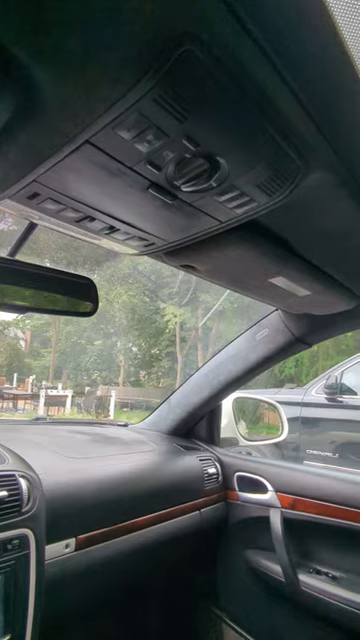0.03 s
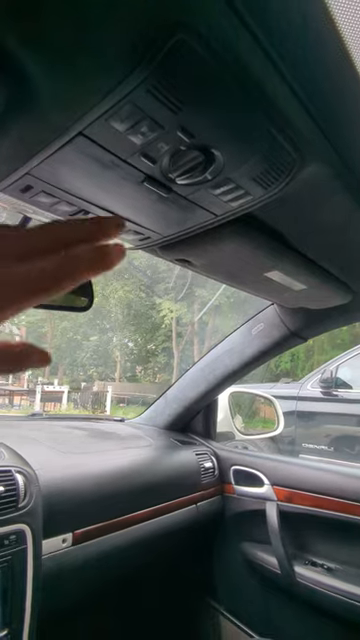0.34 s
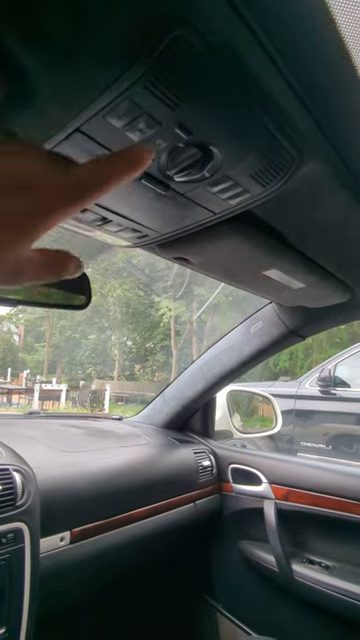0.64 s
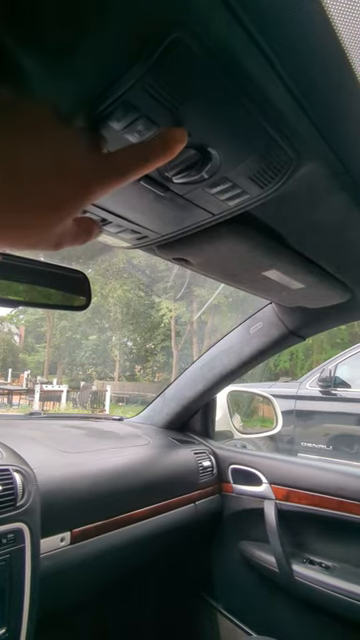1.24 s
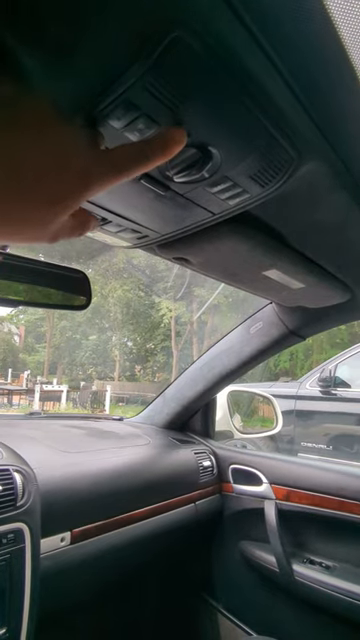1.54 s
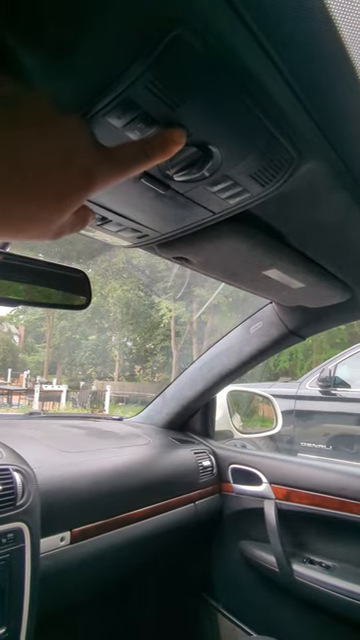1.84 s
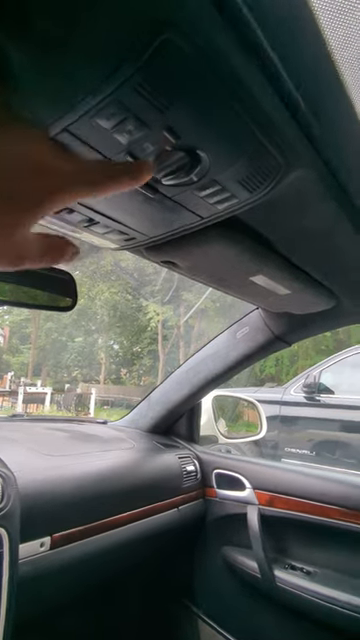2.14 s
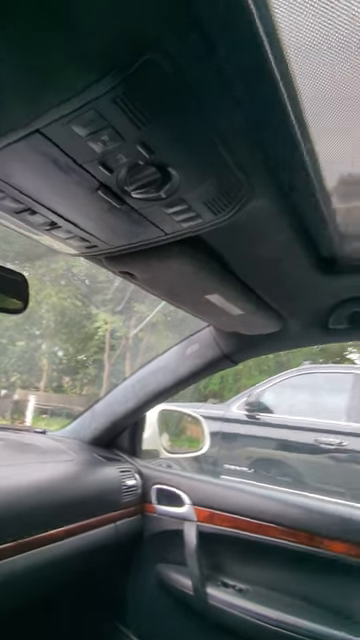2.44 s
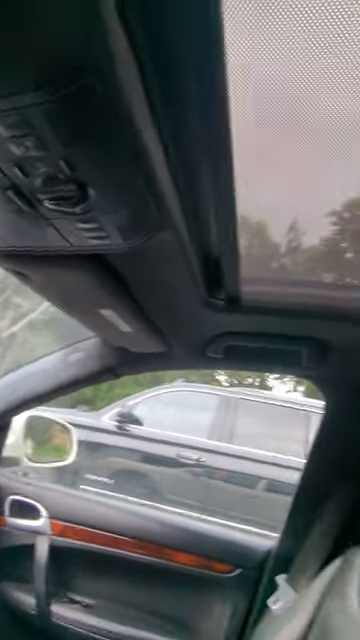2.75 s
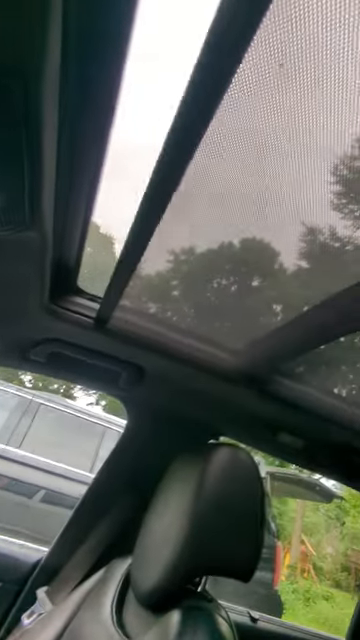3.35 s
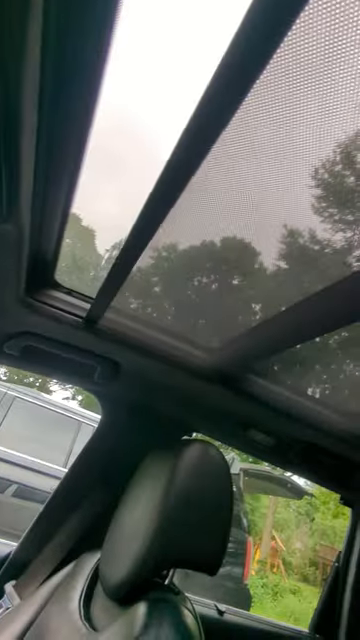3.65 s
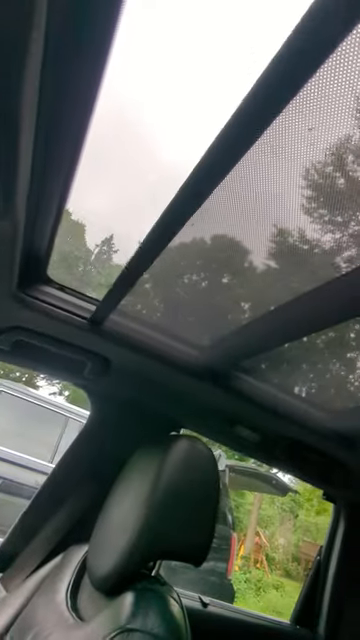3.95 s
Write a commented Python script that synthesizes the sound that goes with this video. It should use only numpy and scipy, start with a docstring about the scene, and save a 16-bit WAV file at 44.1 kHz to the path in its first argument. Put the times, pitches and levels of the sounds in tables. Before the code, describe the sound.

A car's sunshade motor whirs and slides the shade open after a switch click.

```python
"""A small geared motor takes up its slack with a clatter and whirs on, drawing a car's sunshade along
its rails. Its tones are multiples of one rotation speed, and its brush hiss rings in the housing.
Sliding friction makes the shade rumble, hiss, rub, squeal briefly and creak; it also bumps and ticks.
Just before the motor starts, a finger clicks a switch in the hollow roof console.
Beneath it all the parked car idles with a low hum."""
import sys
import numpy as np
from scipy import signal
from scipy.fft import rfft, irfft
from scipy.io import wavfile

SR = 44100
rng = np.random.default_rng(int(sys.argv[2]) if len(sys.argv) > 2 else 0)


def put_to_file(sound):
    """Save the sound as 16-bit audio at rate SR, in the file named by the first command-line argument."""
    columns = np.atleast_2d(sound).T  # one column per channel
    safe = np.clip(columns, -1, 1)
    whole_steps = np.round(safe * 32767)
    wavfile.write(sys.argv[1], SR, whole_steps.astype(np.int16))


N = 176400
T = np.arange(N) / SR
MOTOR_START_S, SPIN_UP_S = 2.055, .05
CABIN_T60_S, CUTOFF_HZ = 0.1, 16000

# Friction on the rails. Each row: time in seconds, rumble level in dB, hiss level in dB.
RAIL_FRICTION = [(2.15, -51, -52.5), (2.42, -47, -49), (2.55, -48, -46.5), (2.74, -44.5, -45),
                 (2.86, -45, -49), (3.1, -44, -47.5), (3.25, -43.5, -46), (3.45, -41, -45),
                 (3.62, -47, -50), (4.0, -48, -49)]


def from_db(db):
    """Amplitude grows tenfold with every 20 dB."""
    return 10 ** (np.asarray(db) / 20)


def rms_one(x):
    """Dividing by the root mean square gives unit power."""
    return x / np.sqrt(np.mean(x ** 2) + 1e-20)


def in_time(rows):
    """Linear interpolation in time turns each column into a continuous curve."""
    s, *columns = np.transpose(rows)
    return [np.interp(T, s, c) for c in columns]


def at_hz(points, hz):
    """Interpolation on a log-frequency axis reads a spectrum between its points."""
    f, value = np.transpose(points)
    return np.interp(np.log(hz + 1e-9), np.log(f), value)


def pan(db):
    """A level difference, left minus right in dB, is split evenly between the ears."""
    return from_db(np.array([[db / 2], [-db / 2]]))


def drift(rate_hz):
    """Low-passed noise gives a random fluctuation of unit power."""
    f = np.arange(N // 2 + 1) * SR / N
    return rms_one(irfft(rfft(rng.standard_normal(N)) / (1 + (f / rate_hz) ** 2), N))


def noise(spectrum, correlation=None):
    """Coloured noise of unit power, whose common and opposed parts set the interaural correlation."""
    # Likeness at the ears of sound from the roof. Each row: frequency in Hz, correlation.
    roof_correlation = [(100, 0.92), (300, -0.28), (600, 0.58), (1200, -0.58), (4000, 0.11), (10000, 0.078)]
    f = np.arange(N // 2 + 1) * SR / N
    mid, side = rfft(rng.standard_normal((2, N)))
    alike = np.clip(at_hz(roof_correlation if correlation is None else correlation, f), -1, 1)
    both = np.sqrt(1 + alike) * mid + np.sqrt(1 - alike) * side * [[1], [-1]]
    return rms_one(irfft(both * from_db(at_hz(spectrum, f)) * (f > 20), N))


def impulses(rows):
    """Brief contacts act as impulses. Each row: time in seconds, level in dB, left-right dB."""
    out = np.zeros((2, N)) + 1e-18
    for s, db, side_db in rows:
        out[:, min(int(s * SR), N - 1)] += from_db(db) * pan(side_db)[:, 0]
    return out


def ring(x, hz, t60):
    """A damped oscillator answers each impulse with a sine that falls 60 dB in t60 seconds."""
    r, w = from_db(-60 / (t60 * SR)), 2 * np.pi * hz / SR
    return signal.lfilter([0, np.sin(w)], [1, -2 * r * np.cos(w), r * r], x)


def struck(x, modes):
    """A body's response is the superposition of its modes, here with alternating signs."""
    return sum((-1) ** k * from_db(db) * ring(x, hz, t60) for k, (hz, db, t60) in enumerate(modes))


def resonate(x, resonances):
    """A resonance rings for a time inversely proportional to its bandwidth."""
    return struck(x, [(hz, db, np.log(1000) / (np.pi * width)) for hz, width, db in resonances])


def decaying_power(x, t60):
    """Damping makes the power of each impulse decay exponentially."""
    return signal.lfilter([1], [1, -from_db(-120 / (t60 * SR))], x ** 2)


def crack(rows, spectrum, t60, tail_db, rise_s=0.001):
    """Dense plastic modes merge into noise: a quick rise, a fast decay and a short cabin tail."""
    hits = impulses(rows)
    power = decaying_power(hits, t60) + from_db(tail_db) ** 2 * decaying_power(hits, CABIN_T60_S)
    pole = np.exp(-1 / (rise_s * SR))
    return noise(spectrum) * np.sqrt(signal.lfilter([1 - pole], [1, -pole], power))


def diffuse(x, envelope):
    """Many random echo paths act as convolution with shaped noise of unit energy."""
    echoes = rng.standard_normal((2, len(envelope))) * envelope
    return signal.fftconvolve(x, echoes / np.sqrt(np.sum(echoes ** 2) / 2), axes=1)[:, :N]


def reflections(x):
    """Reflections off glass and trim form a short reverberation that begins after 2 ms."""
    t = T[:SR // 5]
    return diffuse(x, from_db(-60 * t / CABIN_T60_S) * (t > .002))


def scattered(x, decay_s=.0005):
    """Scattering from nearby trim smears each tick over a millisecond or two."""
    return diffuse(x, np.exp(-T[:SR // 100] / decay_s))


def lagged(x, lag_s=0.00038):
    """Interaural delay: sound from the roof reaches the right ear a little later."""
    return np.array([x[0], np.interp(T - lag_s, T, x[1])])


def cabin_balance(x):
    """The cabin's transfer function favours one ear or the other according to frequency."""
    # Each row: frequency in Hz, left-right difference in dB.
    balance = [(100, 1.5), (380, -1), (700, 2), (1300, -1.5), (2300, -1.5), (4400, -2), (8000, 1),
               (15000, 1)]
    side_db = at_hz(balance, np.arange(N // 2 + 1) * SR / N)
    return irfft(rfft(x) * pan(side_db)[:, 0], N)


def idle():
    """The engine's periodic vibration gives wavering tones over the broadband noise of the cabin air."""
    # Engine tones. Each row: frequency in Hz, level in dB.
    engine_tones = [(37.7, -53), (113, -59), (183, -58), (269, -65)]
    # Cabin noise. Each row: frequency in Hz, relative spectral density in dB.
    air_spectrum = [(30, -18), (45, 1), (62, -8.5), (100, -2.5), (145, -8), (190, -6), (250, -10.5),
                    (400, -16.5), (560, -22.5), (700, -28), (1000, -29.5), (1300, -37.5), (2500, -45.5),
                    (5000, -53.5), (9000, -57.5), (16000, -63)]
    # Its likeness at the two ears. Each row: frequency in Hz, correlation.
    air_correlation = [(40, 0.95), (120, 1), (300, 0.63), (1000, 0.22), (8000, 0)]
    hum = sum(from_db(db + 0.06 * drift(3.2)) * np.sin(2 * np.pi * hz * T + 0.35 * drift(1.0))
              for hz, db in engine_tones)
    return np.sqrt(2) * hum + from_db(-48.5) * noise(air_spectrum, air_correlation)


def finger():
    """Friction of skin on the plastic console gives faint swells of noise."""
    # Each row: time of the peak in seconds, half-width in seconds, level in dB.
    touches = [(1.07, 0.044, -62), (1.656, 0.022, -60), (1.825, 0.12, -62)]
    # Skin friction. Each row: frequency in Hz, relative spectral density in dB.
    skin_spectrum = [(500, 5.5), (1200, 9.5), (2500, -4), (6000, -17), (15000, -28)]
    contact = sum(from_db(db) * np.exp(-((T - s) / width) ** 2) for s, width, db in touches)
    return noise(skin_spectrum) * contact


def switch(t60=0.031, tail_db=-5.5, console_lag_s=0.0016):
    """Impulse excitation: each click snaps, then sets the hollow console ringing."""
    # Each row: time in seconds, then the levels in dB of snap, tock and thump.
    clicks = [(1.779, -68, -52.5, -48), (1.8217, -58, -41.5, -40.5), (1.87, -51, -49.5, -49),
              (1.8967, -29, -33.5, -25.5), (1.907, -40, -38.5, -38), (1.9316, -61, -46.5, -51)]
    # Bright snap and hollow tock. Each row: frequency in Hz, relative spectral density in dB.
    snap_spectrum = [(3000, -12), (5000, -17), (6200, -2.5), (7400, -9), (9300, 2), (11000, -2.5),
                     (13000, 1.5), (15500, -2)]
    tock_spectrum = [(350, -18), (550, -23), (900, 2.5), (1300, -5.5), (2150, -0.5), (3100, -13),
                     (4000, -10), (5000, -17), (9000, -26)]
    # Each row: frequency in Hz, gain in dB, time to fall 60 dB in seconds.
    console_modes = [(139, -2, 0.14), (205, -1, 0.082), (419, 2, 0.016), (548, 1, 0.037),
                     (665, -3.5, 0.028), (890, -8, 0.052)]
    s, snap_db, tock_db, thump_db = np.transpose(clicks)
    centre = np.zeros(len(s))
    snap = crack(zip(s, snap_db, centre), snap_spectrum, t60, tail_db)
    tock = crack(zip(s + console_lag_s, tock_db, centre), tock_spectrum, t60, tail_db)
    thump = struck(impulses(zip(s + console_lag_s, thump_db, centre)), console_modes)
    return snap + tock + thump + from_db(-3.5) * reflections(thump)


def creaks(slip_s=.0067, jitter=.17, fade_db_per_s=35, spread_db=2.5):
    """Stick-slip motion of the shade excites resonances with quick, uneven runs of pulses."""
    # Each row: start in seconds, length in seconds, nominal level of the first slip in dB.
    runs = [(3.348, .066, -29.3), (3.451, .022, -33.5), (3.5235, .012, -32)]
    # Each row: frequency in Hz, bandwidth in Hz, gain in dB.
    resonances = [(1850, 450, 0), (2450, 650, -2), (3200, 600, -3), (5500, 2500, -13)]
    slips = []
    for start, length, db in runs:
        for age in np.arange(0, length, slip_s):
            s = start + age + slip_s * rng.normal(0, jitter)
            slip_db = db - fade_db_per_s * age + rng.normal(0, spread_db)
            slips.append((s, slip_db, rng.normal(0, spread_db)))
    direct = resonate(impulses(slips), resonances)
    return direct + from_db(-12) * reflections(direct)


def ticks(running, grit_per_s=57, grit_db=8.5):
    """Small impacts in the rails, single ticks and fine random grit, excite broad resonances."""
    # Each row: time in seconds, level in dB, left-right difference in dB, low-pass corner in Hz.
    impacts = [(3.0895, -24, 1, 9000), (3.099, -27, 0, 7000), (3.13, -29, 4, 6000), (3.18, -27.5, 0, 5000),
               (3.2972, -20.5, 7, 5500), (3.3135, -20.5, -3, 5000), (3.3405, -17.5, 7, 11000),
               (3.444, -20, 10, 12000), (3.5165, -20.5, 6, 4200), (3.5762, -19, 6, 7000),
               (3.7228, -19.5, 9, 5600)]
    # Each row: frequency in Hz, bandwidth in Hz, gain in dB.
    resonances = [(1700, 700, -4), (2970, 1230, -2), (4900, 1670, -1), (8600, 1600, -5)]
    _, hiss_db = in_time(RAIL_FRICTION)
    grains = rng.random(N) < grit_per_s / SR
    grit = running * grains * from_db(hiss_db + grit_db) * rng.standard_normal((2, N))
    taps = 0
    for *impact, corner_hz in impacts:
        dulling = signal.butter(2, min(corner_hz, CUTOFF_HZ), fs=SR, output="sos")
        taps = taps + signal.sosfilt(dulling, impulses([impact]))
    direct = resonate(taps + grit, resonances)
    return from_db(-4.5) * direct + from_db(-10) * scattered(direct) + from_db(-8.5) * reflections(direct)


def squeal(roughness=1.2, rough_hz=85):
    """Self-excited oscillation: friction on the rail locks into one rough, slightly falling tone."""
    # Each row: time in seconds, frequency in Hz, level in dB.
    contour = [(2.54, 3030, -68), (2.59, 3010, -53.5), (2.63, 2980, -51.5), (2.69, 2920, -55),
               (2.735, 2910, -59), (2.76, 2930, -53), (2.8, 2930, -70)]
    hz, db = in_time(contour)
    sounding = (T > contour[0][0]) & (T < contour[-1][0])
    # A complex factor disturbs both amplitude and phase.
    grip = np.array([1 + roughness * (drift(rough_hz) + 1j * drift(rough_hz)) for ear in range(2)])
    tone = np.real(grip * np.exp(2j * np.pi * np.cumsum(hz) / SR))
    return sounding * from_db(db) * rms_one(tone)


def shade(running, grains_per_s=350):
    """Uneven sliding friction makes the shade rumble and hiss; gritty rubs excite resonances."""
    # Sliding noises. Each row: frequency in Hz, relative spectral density in dB.
    rumble_spectrum = [(40, -6), (80, 2.5), (120, -3.5), (180, 4), (250, -7.5), (330, -1.5), (420, -2.5),
                       (600, -9.5), (900, -11.5), (1500, -38), (4000, -38)]
    hiss_spectrum = [(400, -30), (900, 3.5), (1250, 4.5), (1600, 3), (2200, 0.5), (3200, -6), (4700, -11),
                     (7000, -11.5), (9000, -16), (15000, -16)]
    # Each row: start and end in seconds, level in dB, resonance in Hz, bandwidth in Hz.
    rubs = [(2.48, 2.6, -52.5, 850, 300), (2.56, 2.79, -48.5, 1510, 45), (2.79, 2.97, -54.5, 1500, 30),
            (2.78, 3.02, -58, 4450, 130), (2.44, 3.28, -55.5, 1950, 600)]
    rumble_db, hiss_db = in_time(RAIL_FRICTION)
    rough_db = 1.5 * drift(36)
    rumble = from_db(rumble_db + rough_db) * noise(rumble_spectrum)
    hiss = from_db(hiss_db + rough_db) * noise(hiss_spectrum)
    out = running * (rumble + hiss)
    for start, end, db, hz, width in rubs:
        progress = np.clip((T - start) / (end - start), 0, 1)
        pressure = np.sqrt(np.abs(np.sin(np.pi * progress)))
        grains = (rng.random(N) < grains_per_s / SR) * rng.standard_normal((2, N))
        ringing = rms_one(resonate(grains + 1e-18, [(hz, width, 0)]))
        out = out + from_db(db + rough_db) * pressure * ringing
    return out


def knocks(t60=0.029, tail_db=-4.5, boom_t60=0.021):
    """Impacts of drive and shade excite free vibration: the roof thuds, plastic clacks, rails rattle."""
    # Each row: time in seconds; thud, clack, rattle, left-right difference and boom in dB;
    # boom frequency in Hz, which depends on where the knock lands.
    impacts = [(2.049, -35.5, -44.5, -46, 4, -34, 200), (2.0597, -26.5, -39.5, -43, -7, -32, 160),
               (2.068, -26, -31, -51, 2, -16.5, 290), (2.075, -21.5, -30.5, -43, -1, -26.5, 420),
               (2.078, -23.5, -35, -49, 6.5, -17.5, 320), (2.0849, -20.5, -33.5, -27, -0.5, -28, 186),
               (2.1059, -28.5, -26, -33.5, 1, -39, 260), (2.1131, -42, -29, -35.5, -3, -27, 170),
               (2.1175, -38, -43, -50, 1, -19, 148), (2.753, -34, -50, -56, 0, -27, 150),
               (2.922, -28.5, -39, -48, -0.5, -26, 217), (3.034, -41, -42, -45, -1, -34, 300),
               (3.046, -39, -60, -62, 7, -27, 150), (3.2375, -27, -34.5, -42.5, 0, -27, 236),
               (3.2594, -46, -41.5, -46, -2, -27, 175), (3.444, -42, -40, -44.5, -5, -32.5, 280)]
    # Each row: frequency in Hz, gain in dB, time to fall 60 dB in seconds.
    roof_modes = [(133, -14, 0.084), (200, -12, 0.034), (313, -4, 0.065), (385, 1.5, 0.028),
                  (468, -2, 0.059), (575, -2, 0.019)]
    # Plastic and rails. Each row: frequency in Hz, relative spectral density in dB.
    clack_spectrum = [(400, -8), (650, -3), (1000, 0), (1350, -4.5), (2000, 0.5), (3000, -8), (4200, -12),
                      (7000, -60)]
    rattle_spectrum = [(2000, -28), (3500, 0), (5400, 6), (7200, 0.5), (9000, -3), (11000, -3.5),
                       (15500, -4.5)]
    s, thud_db, clack_db, rattle_db, side_db, boom_db, boom_hz = np.transpose(impacts)
    thud = struck(impulses(zip(s, thud_db, side_db)), roof_modes)
    boom = sum(ring(impulses([row]), hz, boom_t60) for *row, hz in zip(s, boom_db, side_db, boom_hz))
    clack = crack(zip(s, clack_db, side_db), clack_spectrum, t60, tail_db)
    rattle = crack(zip(s, rattle_db, side_db), rattle_spectrum, t60, tail_db)
    return lagged(from_db(-4.5) * thud + boom) + from_db(-7.5) * reflections(thud) + clack + rattle


def rotor_hum(angle):
    """Periodic forces in rotor and gears radiate harmonics of the rotation speed."""
    # Each entry: cycles per turn of one tone.
    harmonics = [2, 3, 5, 7, 10, 11, 13, 21, 28, 31, 38, 40]
    # Each row, one per harmonic: level in dB, left-right difference in dB.
    levels = [(-60, -3), (-57.5, -3), (-60, -7), (-57.5, 8.5), (-64, 5), (-58.5, -3), (-57, 1.5),
              (-63.5, 4), (-61.5, 11.5), (-65.5, -9), (-65.5, -2), (-66, -5)]
    hum = 0
    for multiple, (db, side_db) in zip(harmonics, levels):
        phase = rng.uniform(0, 2 * np.pi) + .3 * drift(0.38) * np.array([[1], [-1]])
        gain = pan(side_db) * from_db(db + 1.5 * drift(6.7))
        hum = hum + gain * np.sin(multiple * angle + phase)
    return lagged(hum)


def gear_whine(angle, speed, hum_side_db=8, drone_side_db=6, right_lag_s=.00019):
    """Changing load modulates the amplitude of the three strongest gear and rotor harmonics."""
    # The entries: cycles per turn of hum, drone and whine.
    harmonics = [6, 9, 20]
    # Each row: time in seconds; hum, drone and whine in dB; the whine's left-right difference in dB.
    swells = [(2.18, -47, -60, -54.5, 15), (2.35, -54.5, -62, -56.5, 4), (2.55, -51.5, -55, -60.5, 10),
              (2.75, -52.5, -54, -55.5, 0), (2.95, -49.5, -55, -63.5, 15), (3.15, -52, -54, -55.5, 10),
              (3.35, -51, -54, -58, 10), (3.52, -54.5, -51.5, -58, 10), (3.77, -51, -54.5, -57, 1),
              (3.97, -57.5, -55, -58.5, -3)]
    *levels_db, whine_side_db = in_time(swells)
    angle_at_ears = np.array([angle, angle - 2 * np.pi * speed * right_lag_s])
    whine = 0
    for multiple, db, side_db in zip(harmonics, levels_db, (hum_side_db, drone_side_db, whine_side_db)):
        gain = from_db(db + side_db * np.array([[.5], [-.5]]) + 1.1 * drift(7))
        whine = whine + gain * np.sin(multiple * angle_at_ears)
    return whine


def brushes(angle, bars=10, ripple_depth=0.058, fade_db_per_s=3):
    """Brush friction noise, modulated at each turn and commutator bar, resonates in the housing."""
    # Each row: frequency in Hz, relative spectral density in dB.
    brush_spectrum = [(400, -38), (750, 1), (1250, -7.5), (2100, -5), (3500, -18.5), (5500, -10.5),
                      (7500, -14), (12000, -23), (16000, -18)]
    # Each row: frequency in Hz, bandwidth in Hz, level in dB, fade in dB per second.
    housing_resonances = [(1490, 80, -63, 0), (2950, 160, -66, 0), (4450, 200, -61, 3), (5950, 450, -59, 6),
                          (7650, 400, -66, 2), (8850, 260, -64.5, 0), (10000, 300, -68, 1),
                          (12100, 700, -65, 2), (15000, 300, -71, 1)]
    elapsed = T - MOTOR_START_S
    ripple = 1 + ripple_depth * (np.sin(angle) + np.sin(bars * angle))
    hiss = from_db(-53.5 - fade_db_per_s * elapsed) * rms_one(noise(brush_spectrum) * ripple)
    housing = 0
    for hz, width, db, fade in housing_resonances:
        friction = rng.standard_normal((2, N)) * ripple
        ringing = signal.lfilter(*signal.iirpeak(hz, hz / width, fs=SR), friction)
        housing = housing + from_db(db - fade * elapsed + 1.5 * drift(12)) * rms_one(ringing)
    return hiss + housing


def motor(running, flutter=.0015):
    """The shaft angle, the integral of its speed, locks the tones and the brush ripple together."""
    # Each row: time in seconds, nominal speed in turns per second.
    shaft_speed = [(2.14, 54.1), (2.216, 54.5), (2.356, 53.4), (2.522, 52.7), (2.672, 54.0), (2.766, 54.2),
                   (3.066, 52.6), (3.512, 52.7), (3.724, 52.8), (3.822, 53.6), (4.0, 52.8)]
    speed, = in_time(shaft_speed)
    angle = 2 * np.pi * np.cumsum(speed * running * (1 + flutter * drift(11.5))) / SR
    tones = rotor_hum(angle) + gear_whine(angle, speed)
    return running * (np.sqrt(2) * tones + brushes(angle))


def scene():
    """The sources add by superposition: idle, finger and switch, then the motor and its shade."""
    running = np.clip((T - MOTOR_START_S) / SPIN_UP_S, 0, 1)
    cabin = idle() + finger() + switch()
    drive = cabin_balance(knocks() + motor(running) + shade(running))
    return cabin + drive + squeal() + ticks(running) + creaks()


def record(dry, low_cut_hz=32.2, silent_s=0.034, fade_s=0.025):
    """Band limiting removes the lowest bass and the highest treble; the sound fades in quickly."""
    high_pass = signal.butter(6, low_cut_hz, "high", fs=SR, output="sos")
    low_pass = signal.ellip(12, .1, 80, CUTOFF_HZ, fs=SR, output="sos")
    fade_in = np.clip((T - silent_s) / fade_s, 0, 1)
    return signal.sosfilt(low_pass, signal.sosfilt(high_pass, dry) * fade_in)


dry = scene()
out = record(dry)
put_to_file(out)
```